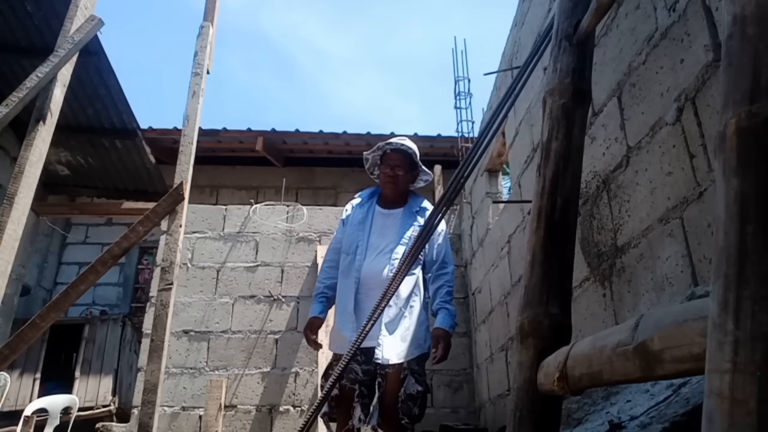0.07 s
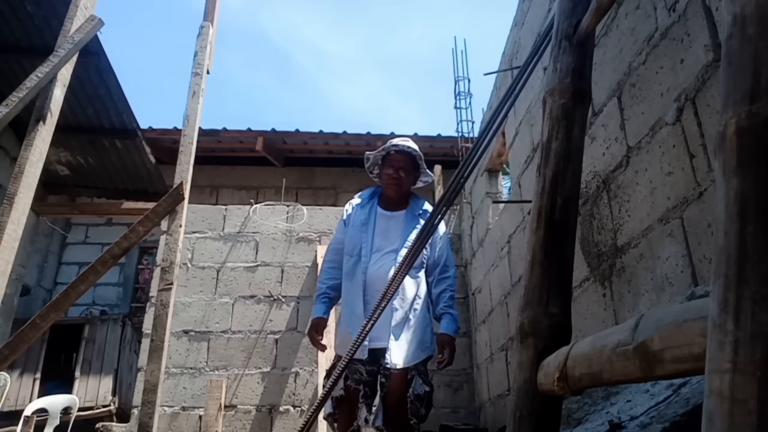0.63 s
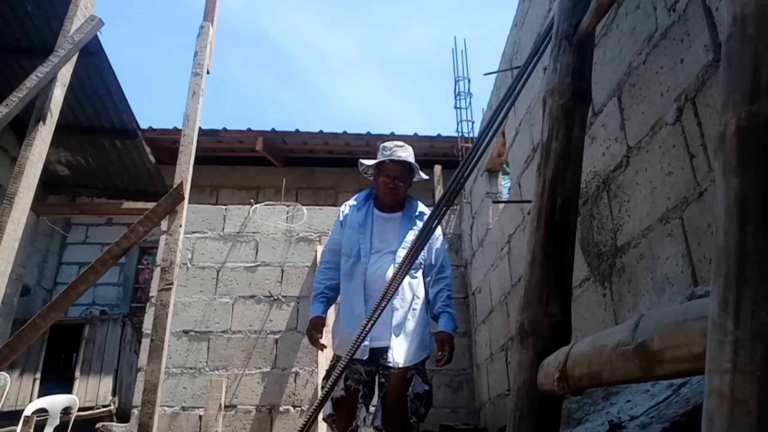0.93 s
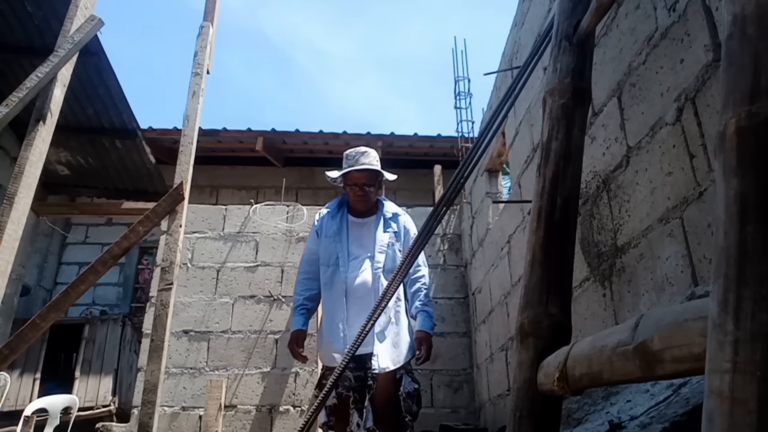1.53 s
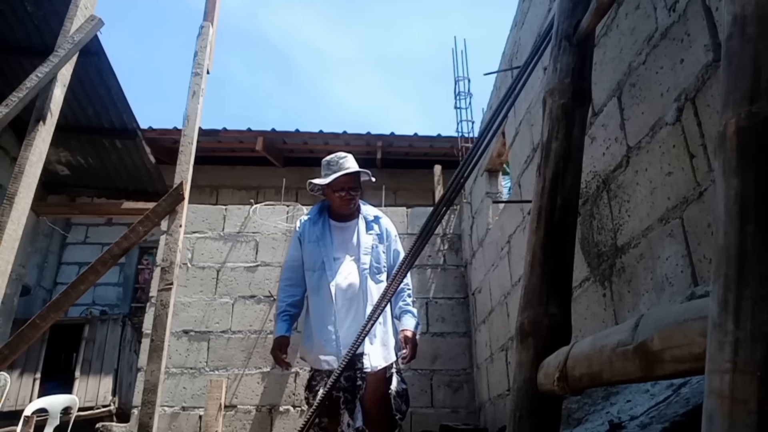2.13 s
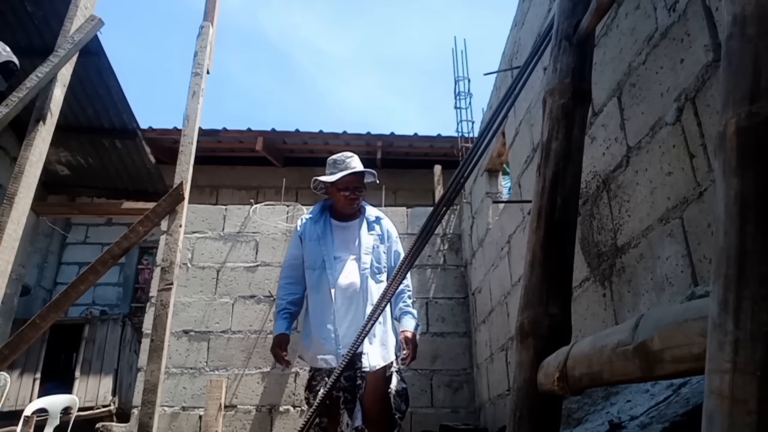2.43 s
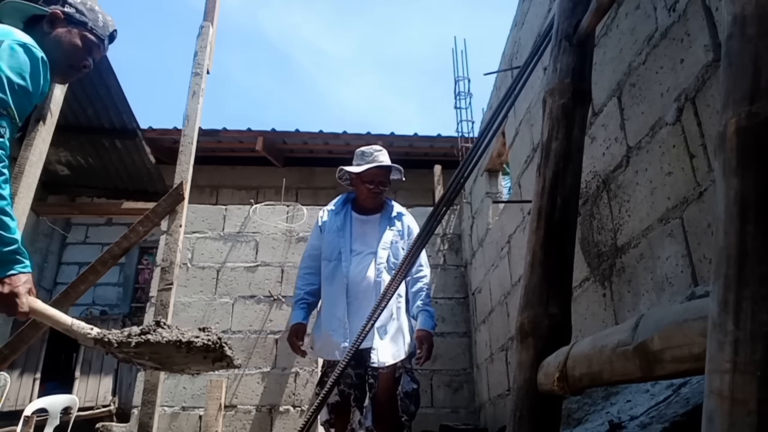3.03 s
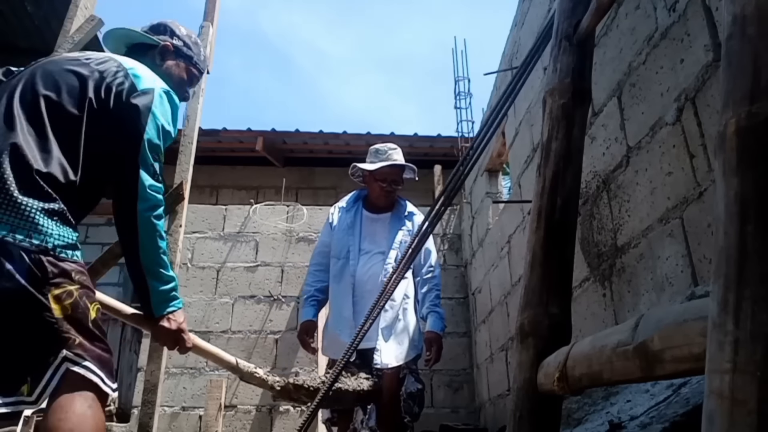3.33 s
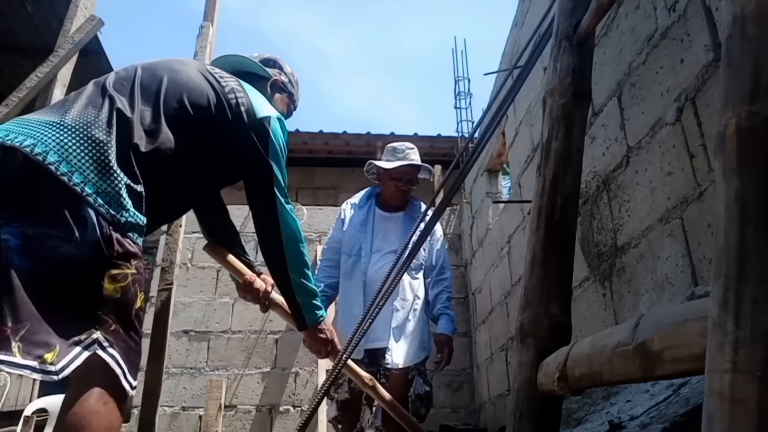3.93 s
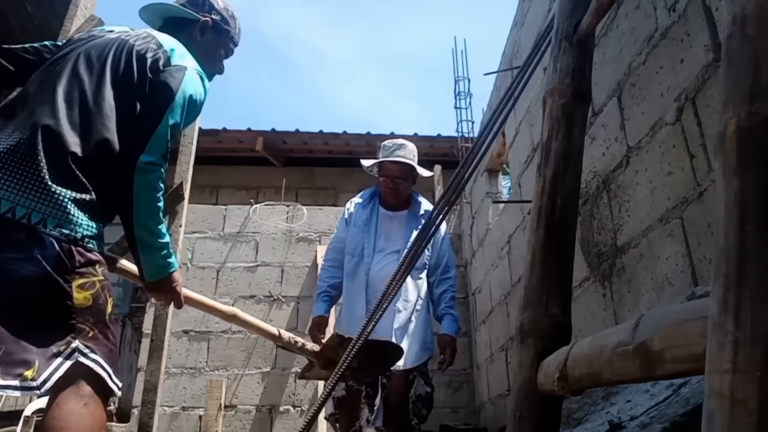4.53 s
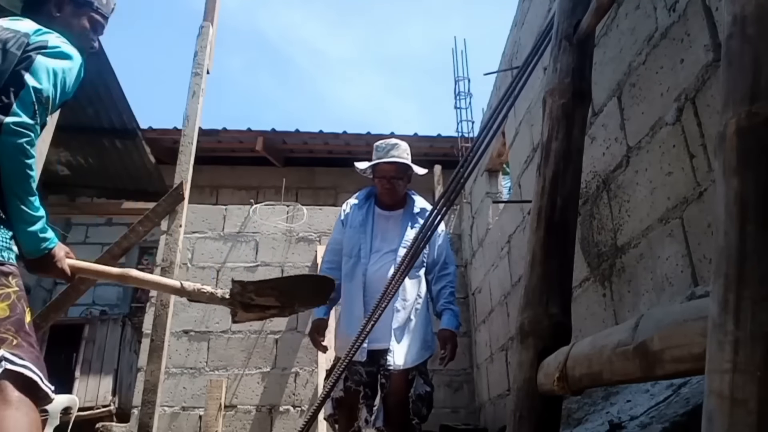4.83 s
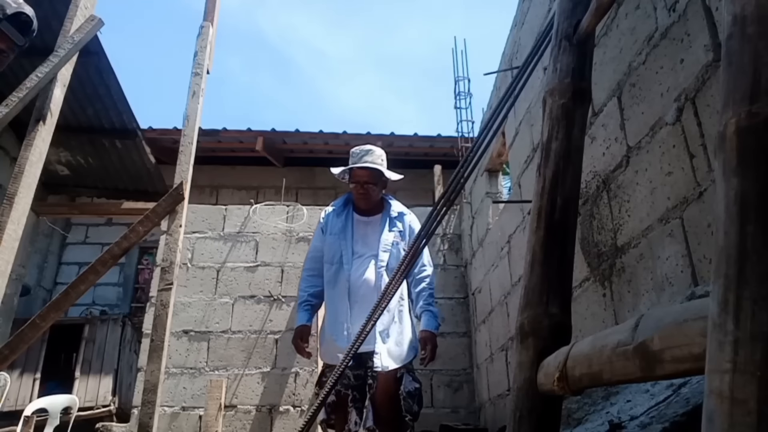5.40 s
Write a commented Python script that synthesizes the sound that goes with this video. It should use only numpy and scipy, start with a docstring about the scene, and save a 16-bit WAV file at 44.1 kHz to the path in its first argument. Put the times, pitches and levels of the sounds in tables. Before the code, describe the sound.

In a quiet building yard with block walls, a worker shovels wet concrete near the microphone. Two crunching, hissing scoops come first, with sharp stone clicks on steel and dull wet thuds. A quieter stretch of gritty footsteps leads to the mix slithering off the blade and slapping down. The shovel squeaks faintly, boots shuffle, and a light knock ends the work over soft outdoor air.

```python
"""A walled building yard, one microphone close to a heap of wet concrete. Over quiet air a boot lands.
A shovel bites twice: stones click on the steel blade, wet lumps thud and the mix slithers after them.
The worker steps up, the shovel squeaking faintly, and near 3.8 s the load slides off with a slap.
Last, boots and shovel scuff over grit and the blade is set down; the block walls answer briefly."""
import sys
import numpy as np
from scipy import signal
from scipy.fft import rfft, irfft, next_fast_len
from scipy.io import wavfile
from scipy.ndimage import map_coordinates

SR = 44100
rng = np.random.default_rng(int(sys.argv[2]) if len(sys.argv) > 2 else 0)


def bounce(signal):
    """Save signal as a 16-bit WAV file at the path given by the first command-line argument."""
    frames = np.transpose(np.atleast_2d(signal))
    limited = np.clip(frames, -1, 1)
    pcm = np.round(limited * 32767).astype(np.int16)
    wavfile.write(sys.argv[1], SR, pcm)


N = 245195


def amp(db):
    """Decibels to gain."""
    return 10 ** (np.asarray(db) / 20)


def unit(x):
    """Scale to rms 1."""
    return x / np.sqrt(np.mean(x ** 2) + 1e-20)


def along(points, hz):
    """Interpolate (Hz, value) points on a log frequency axis."""
    f, v = np.transpose(points)
    return np.interp(np.log(hz + 1), np.log(f + 1), v)


def wobble(rate):
    """A smooth random curve, rate knots a second."""
    return map_coordinates(rng.standard_normal(int(N * rate / SR) + 4), [np.arange(N) * rate / SR])


def resonance(f, hz, width):
    """The response of one damped mode, 1 at its centre."""
    return 1j * f * width / (hz * hz - f * f + 1j * f * width)


def filtered(x, response):
    """x times a complex response of frequency."""
    m = next_fast_len(len(x) + SR // 2)
    return irfft(rfft(x, m) * response(np.fft.rfftfreq(m, 1 / SR)), m)[:len(x)]


def coloured(x, spectrum):
    """x through a minimum-phase filter with the given spectrum, at rms 1."""
    size = 4096
    gain = amp(along(spectrum, np.fft.rfftfreq(size, 1 / SR)))
    cepstrum = irfft(np.log(gain))
    cepstrum[1:size // 2] *= 2
    cepstrum[size // 2 + 1:] = 0
    impulse = irfft(np.exp(rfft(cepstrum)))
    return unit(signal.fftconvolve(x, impulse)[:len(x)])


def grains(rate, smear, spread_db=3):
    """Tiny contacts of uneven size, rate a second, over a smear of countless finer ones."""
    hit = rng.random(N) < rate / SR
    size = amp(spread_db * np.minimum(rng.exponential(size=N), 2))
    contacts = unit(hit * size * rng.choice([-1, 1], N))
    return unit(contacts + smear * rng.standard_normal(N))


def envelope(s, attack_db_per_s, hold_s, release_db_per_s):
    """A gain that rises to 1 at s seconds, holds and dies away."""
    t = np.arange(N) / SR - s
    return amp(-attack_db_per_s * np.maximum(-t, 0) - release_db_per_s * np.maximum(t - hold_s, 0))


def add(track, s, sound):
    """Mix a sound into the track at s seconds."""
    part = track[round(s * SR):][:len(sound)]
    part += sound[:len(part)]


# The open air all round the microphone: frequency_hz, level_db
AIR_SPECTRUM = [(15, -40), (25, -22), (167, -3), (257, -5.5), (335, -5), (555, -15), (835, -11.5),
                (1260, -14), (1520, -14.5), (1760, -15.5), (2400, -18.5), (2710, -18), (7800, -33),
                (10100, -58.5), (17200, -120)]


def air():
    """The quiet outdoor background, drifting slightly in level."""
    return amp(-67 + 1.6 * wobble(1.2)) * coloured(rng.standard_normal(N), AIR_SPECTRUM)


# Loose grit being rubbed: frequency_hz, level_db
SCUFF_SPECTRUM = [(300, -11), (900, -4.5), (1600, -2.5), (2500, -0.5), (4000, -3.5), (4900, -8),
                  (7900, -12), (9000, -61.5)]
# Dull lumps, pressed down or tumbling on the blade: frequency_hz, level_db
LUMP_SPECTRUM = [(30, -31.5), (90, -26), (145, -1), (280, 3), (450, -5.5), (800, -5.5), (1300, -12.5),
                 (3000, -30), (8000, -50.5)]
# Scuffs of boots or the lifted shovel, near the microphone: start_s, hold_s, scuff_db, weight_db
GRITTY_SCUFFS = [(0.104, 0.016, -57, -70), (1.222, 0.018, -58, -64), (2.048, 0.096, -61, -64),
                 (2.211, 0.065, -59, -71.5), (2.593, 0.047, -60.5, -68.5), (3.091, 0.066, -47, -62.5),
                 (4.413, 0.048, -70.5, -62), (4.563, .065, -64, -58), (4.683, 0.035, -67, -65),
                 (4.767, .04, -58, -71.5), (4.828, 0.032, -56, -63), (5.06, 0.019, -82.5, -68),
                 (5.204, 0.063, -57.5, -57)]


def scuffs():
    """Short gritty scuffs and slides, from boots or the lifted shovel, over a dull weight that lingers."""
    scuff, weight = np.zeros((2, N))
    attack_db_per_s = 911
    for start_s, hold_s, scuff_db, weight_db in GRITTY_SCUFFS:
        scuff += amp(scuff_db) * envelope(start_s, attack_db_per_s, hold_s, release_db_per_s=289)
        weight += amp(weight_db) * envelope(start_s, attack_db_per_s, hold_s, release_db_per_s=199)
    grit = coloured(grains(rate=1300, smear=1.0), SCUFF_SPECTRUM)
    press = coloured(grains(rate=140, smear=0.87), LUMP_SPECTRUM)
    return amp(-1.62) * scuff * grit + amp(2) * weight * press


# Modes of the steel blade, damped by its load: pitch_hz, width_hz, level_db
BLADE_MODES = [(500, 120, -1.5), (802, 17, -4.5), (949, 93, -3.5), (1074, 23, -10), (1410, 120, -3.5),
               (1626, 180, -2.5), (2420, 270, -6), (2930, 110, -5.5), (3260, 210, -5.5), (3580, 260, -4.5),
               (3980, 220, -3)]


def blade(x, ring_db, wander_db=7.5, wander_hz=45):
    """Contacts heard directly and through the blade, whose modes swell and fade as the contact moves."""
    m = next_fast_len(len(x) + SR // 10)
    spectrum, f = rfft(x, m), np.fft.rfftfreq(m, 1 / SR)
    knots = np.arange(len(x)) * wander_hz / SR
    count = int(knots[-1]) + 2
    out = x
    for pitch_hz, width_hz, level_db in BLADE_MODES:
        wander = np.interp(knots, np.arange(count), np.tanh(rng.standard_normal(count)) * 2)
        ring = irfft(spectrum * resonance(f, pitch_hz, width_hz), m)[:len(x)]
        out = out + amp(ring_db + level_db + wander_db * wander) * ring
    return unit(out)


# Sand, gravel and the wet mass of the heap, heard close: frequency_hz, level_db
SAND_SPECTRUM = [(500, -31.5), (1300, -9.5), (2300, -0.5), (3200, -0.5), (4150, -2.5), (4700, -4.5),
                 (6500, -6.5), (7900, -10), (9000, -59.5)]
GRAVEL_SPECTRUM = [(130, -28.5), (300, -8.5), (480, -4), (680, 2), (950, 4), (1500, 1), (2100, 0.5),
                   (3500, -10), (8000, -39.5)]
MASS_SPECTRUM = [(25, -27.5), (85, -23.5), (125, -6.5), (190, -2), (260, 0.5), (340, -1), (500, -3.5),
                 (1000, -18.5), (4000, -49.5)]
# Force behind the blade, one curve a bite: time_s, level_db
EFFORT_CURVES = [
    [(0.245, -72.5), (0.263, -41), (0.289, -27), (0.361, -25.5), (0.387, -29.5), (0.409, -24.5),
     (0.469, -27.5), (0.497, -24), (0.64, -51.5)],
    [(1.432, -71), (1.44, -49.5), (1.456, -24), (1.52, -16.5), (1.602, -20.5), (1.654, -28.5),
     (1.754, -55.5), (1.79, -58)],
]
# The blade entering the heap: start_s, sink_s, load_db
BITES = [(0.262, 0.027, 0), (1.454, 0.12, 2)]


def shovel_bites():
    """The edge sticks and slips: sand hisses at once; gravel and the shoved heap join in as it sinks."""
    t = np.arange(N) / SR
    sand, gravel, mass = np.zeros((3, N))
    for curve, (start_s, sink_s, load_db) in zip(EFFORT_CURVES, BITES):
        time_s, level_db = np.transpose(curve)
        pushing = (t >= time_s[0]) & (t <= time_s[-1])
        effort = amp(np.interp(t, time_s, level_db)) * pushing
        shallow = 1 - np.clip((t - start_s) / sink_s, 0, 1)  # 1 while skimming, 0 once sunk in
        sand += effort * amp(-1.48)
        gravel += effort * amp(-0.68 + load_db - 10.5 * shallow)
        mass += effort * amp(-13.5 + 2.2 * load_db - 24.5 * shallow)  # grows fastest with the load
    slip = np.tanh(wobble(90))  # the grip builds and lets go, never far from its mean
    hiss = blade(coloured(grains(rate=2500, smear=0.41), SAND_SPECTRUM), ring_db=-5)
    hiss *= unit(amp(1.5 * slip))
    crunch = blade(coloured(grains(rate=650, smear=0.79), GRAVEL_SPECTRUM), ring_db=-2)
    crunch *= unit(amp(2.2 * slip))
    shove = coloured(grains(rate=400, smear=0.2), MASS_SPECTRUM)
    return sand * hiss + gravel * crunch + mass * shove


# Stones and steel meeting at close range: start_s, level_db, body_db, edge_db, pitch_hz, rasp_db
STONE_KNOCKS = [(0.287, -15.5, -14.5, -18.5, 1550, -7), (0.402, -15, -10, -7.5, 3690, 8),
                (0.424, -13.5, -21.5, -10.5, 3620, 9.5), (0.774, -27.5, 4, 6.5, 1640, 10),
                (1.224, -46, -13, 12, 1020, -14.5), (1.456, -15.5, -38, -11, 3198, 0),
                (1.551, -9, -6, -22, 980, -12), (1.778, -47, -4, -35, 940, -1),
                (2.247, -45, -19.5, -21, 3230, -19.5), (2.291, -49, -22, -13, 1690, -18),
                (2.802, -57.5, -18, -9.5, 3000, -10.5), (3.068, -44.5, -16, -21, 2800, -4),
                (3.16, -39.5, -5.5, -25, 740, -9), (3.836, -28.5, -8, -18, 1190, 10),
                (4.422, -55, -10.5, -23, 822, -2), (5.196, -47, -6, -33, 1980, -10.5),
                (5.452, -28, -12.5, -25.5, 1530, -11.5)]


def stone_knocks():
    """A sharp crack, then a short rasp of grit, both ringing the blade; small hard stones sound higher."""
    out, t = np.zeros(N), np.arange(SR // 5) / SR
    crack_t60_s, rasp_t60_s = 0.014, 0.1
    for start_s, level_db, body_db, edge_db, pitch_hz, rasp_db in STONE_KNOCKS:
        decay = amp(-60 * t / crack_t60_s) + amp(rasp_db - 60 * t / rasp_t60_s)
        force = rng.standard_normal(len(t)) * decay
        contact = filtered(force, lambda f: 1 + amp(4) * resonance(f, pitch_hz, 0.5 * pitch_hz))
        spectrum = [(60, -28.5), (170, body_db + 2), (900, 6), (1800, 1.5), (4000, edge_db / 2 + 7.5),
                    (4900, edge_db + 3), (7900, edge_db - 3.5), (9000, -61.5)]
        hit = blade(coloured(contact, spectrum), ring_db=-5.5)
        add(out, start_s, amp(level_db + 2.5) * hit / np.abs(hit).max())
    return out


# Wet lumps and heels landing nearby: start_s, level_db, pitch_hz
LANDINGS = [(0.32, -23, 215), (0.408, -26, 264), (1.546, -18.5, 195), (1.599, -15.5, 300),
            (1.857, -40.5, 301), (2.627, -55.5, 201), (3.16, -35, 228.4), (3.833, -25, 300),
            (4.376, -54.5, 286), (5.247, -49.5, 218), (5.463, -41, 200)]


def thuds():
    """Soft heavy landings: a low plop, each at its own pitch, that dies at once."""
    out, t = np.zeros(N), np.arange(SR // 4) / SR
    force_t60_s = 0.071
    for start_s, level_db, pitch_hz in LANDINGS:
        force = rng.standard_normal(len(t)) * amp(-60 * t / force_t60_s)
        contact = filtered(force, lambda f: 1 + amp(3) * resonance(f, pitch_hz, 0.5 * pitch_hz))
        plop = coloured(contact, MASS_SPECTRUM)
        add(out, start_s, amp(level_db) * plop / np.abs(plop).max())
    return out


# Mortar parting and slurry rubbing on steel, heard close: frequency_hz, level_db
FIZZ_SPECTRUM = [(1500, -36.5), (3500, -7.5), (4800, -2), (6500, -1.5), (7900, -2.5), (9000, -58)]
SLURRY_SPECTRUM = [(300, -15), (900, -6), (1600, -3), (2100, -2.5), (2800, -4.5), (4200, -4.5), (4900, -13),
                   (7900, -15), (9000, -59)]
# Portions of mix sliding on the blade and off it: fastest_s, rise_s, fall_s, level_db, fizz_db, clots_db
PORTIONS = [(0.68, .25, 0.38, -52.5, -18, 2), (0.78, 0.19, 0.21, -48.5, -7.5, -27),
            (0.89, 0.18, 0.11, -54.5, 0.5, -31), (1.03, 0.08, 0.11, -50, -7, -8.5),
            (1.86, 0.32, 0.12, -59.5, -12.5, 8), (1.939, 0.13, 0.15, -60, -2.5, -3),
            (3.5, 0.16, .4, -77.5, 6, 5.5), (3.65, 0.078, 0.13, -64, 5, -7),
            (3.771, 0.096, .16, -46, -15.5, -2.5), (3.856, 0.064, 0.067, -39.5, -4.5, 4),
            (3.93, 0.13, 0.1, -49, -7, -1.5), (4.05, 0.23, .1, -65.5, 0.5, -20),
            (4.25, 0.086, .12, -82, 7, -11), (5.47, 0.022, 0.047, -40.5, -15.5, -9)]


def sliding_mix():
    """Wet mortar gathers speed and comes to rest, fizzing and slithering as heavier clots tumble along."""
    fizz_gain, slither_gain, clots_gain = np.zeros((3, N))
    range_db = 20  # the change of level within one rise or fall time
    for fastest_s, rise_s, fall_s, level_db, fizz_db, clots_db in PORTIONS:
        swell = amp(level_db) * envelope(fastest_s, range_db / rise_s, 0, range_db / fall_s)
        fizz_gain += amp(fizz_db - 0.16) * swell
        slither_gain += amp(-1) * swell
        clots_gain += amp(clots_db - 1.6) * swell
    lumpiness = unit(amp(1.1 * wobble(60)))
    fizz = coloured(grains(rate=3000, smear=0.61), FIZZ_SPECTRUM)
    slither = blade(coloured(grains(rate=1100, smear=0.96), SLURRY_SPECTRUM), ring_db=-3.5)
    clots = blade(coloured(grains(rate=300, smear=0.62), LUMP_SPECTRUM), ring_db=-7)
    return lumpiness * (fizz_gain * fizz + slither_gain * slither + clots_gain * clots)


# The shovel being handled, faint at the microphone: centre_s, length_s, pitch_hz, level_db
HANDLING_SQUEAKS = [(2.600, .016, 2590, -59), (4.607, .04, 1045, -58.5), (4.698, .026, 570, -58),
                    (4.705, .028, 1120, -61), (5.3, .04, 490, -64)]


def shovel_squeaks():
    """Thin, rough tones that swell and fade as the shovel is handled."""
    out, t = np.zeros(N), np.arange(N) / SR
    for centre_s, length_s, pitch_hz, level_db in HANDLING_SQUEAKS:
        wavering_hz = pitch_hz + 40 * wobble(260)
        tone = np.sin(2 * np.pi * np.cumsum(wavering_hz) / SR)
        roughness = amp(3 * wobble(170))
        swell = np.exp(-2 * ((t - centre_s) / length_s) ** 2)
        out += amp(level_db) * swell * unit(tone * roughness)
    return out


# The yard's decay at the microphone: frequency_hz, t60_s
YARD_DECAY = [(150, 0.17), (600, 0.37), (2500, 0.14), (8000, 0.12)]
# Standing waves between the walls: pitch_hz, width_hz, level_db
STANDING_WAVES = [(140, 14, -7), (191, 11, -5), (409, 11, -8)]


def yard(x, tail_db):
    """Close block walls return a short diffuse tail and hold a few low standing waves."""
    hz, t, noise = signal.stft(rng.standard_normal(SR // 2), SR, nperseg=256)
    decay = amp(-60 * t / along(YARD_DECAY, hz)[:, None])
    tail = signal.istft(noise * decay, SR, nperseg=256)[1]
    response = amp(tail_db) * np.pad(tail / np.linalg.norm(tail), (SR // 300, 0))
    response[0] = 1  # the direct path to the microphone
    wet = signal.fftconvolve(x, response / np.linalg.norm(response))[:N]
    return filtered(wet, lambda f: 1 + sum(amp(level_db) * resonance(f, pitch_hz, width_hz)
                                           for pitch_hz, width_hz, level_db in STANDING_WAVES))


def scene():
    """The work from close by, louder than its return off the walls, over the outdoor air; mono."""
    work = shovel_bites() + sliding_mix() + scuffs() + stone_knocks() + thuds() + shovel_squeaks()
    return (yard(work, tail_db=-10) + air())[None]


def record(dry):
    """The microphone feeds a recorder that clips at full scale and cuts off steeply at its band limit."""
    top_hz = 7820
    return np.array([filtered(x, lambda hz: 1 / (1 + (hz / top_hz) ** 160)) for x in np.clip(dry, -1, 1)])


dry = scene()
out = record(dry)
bounce(out)
```